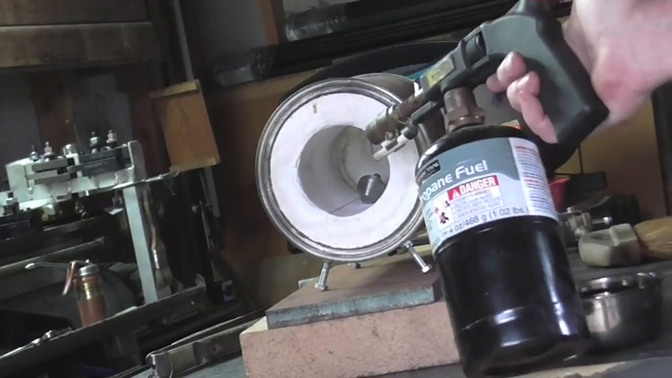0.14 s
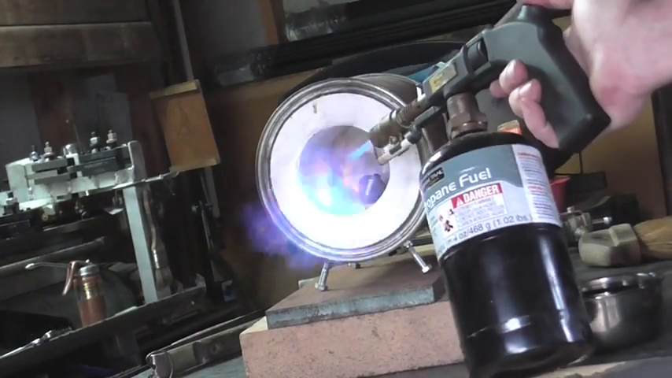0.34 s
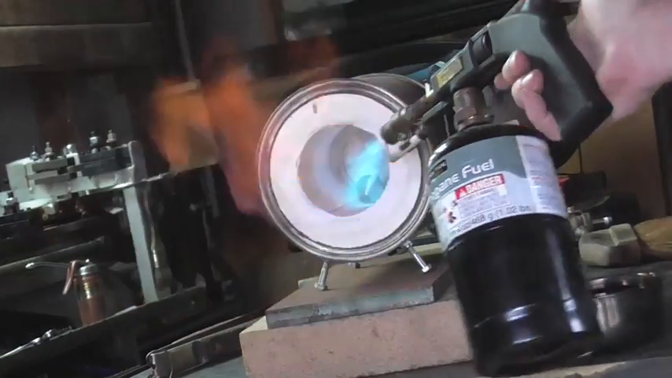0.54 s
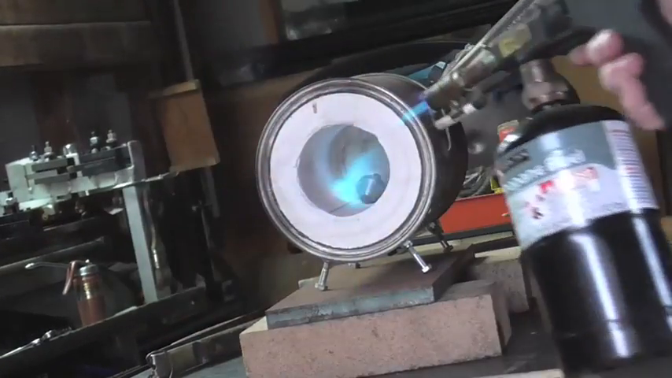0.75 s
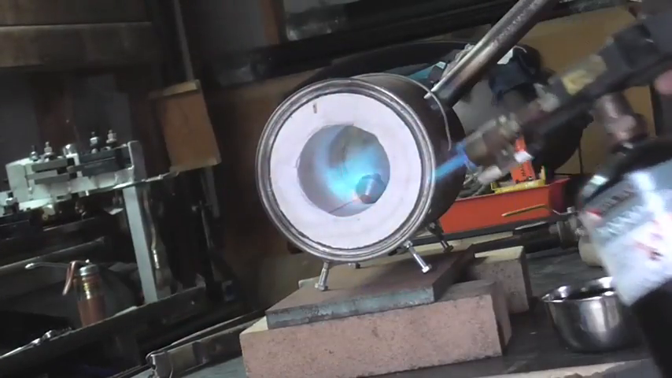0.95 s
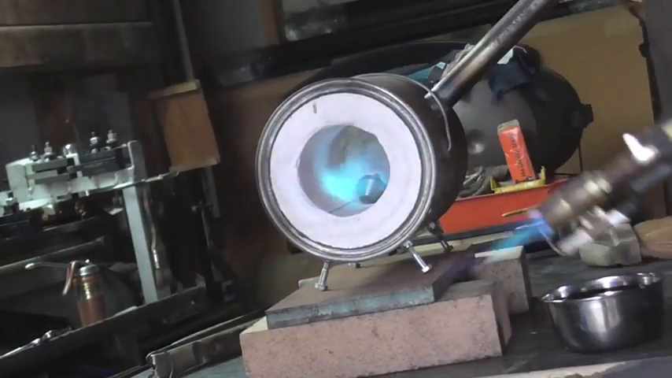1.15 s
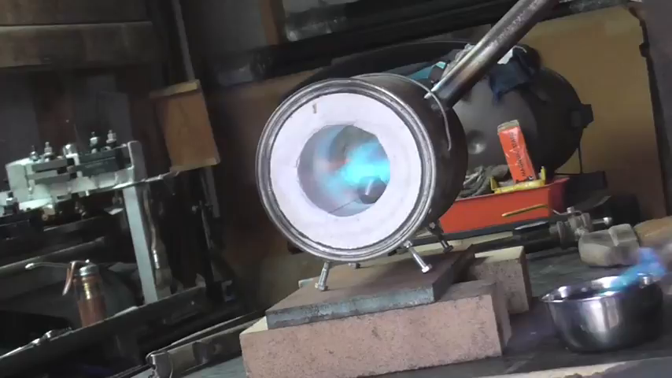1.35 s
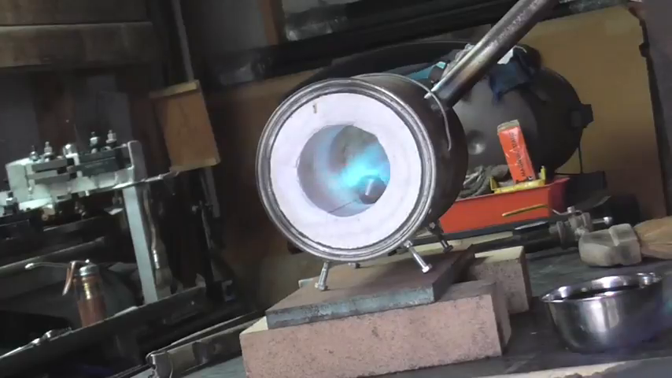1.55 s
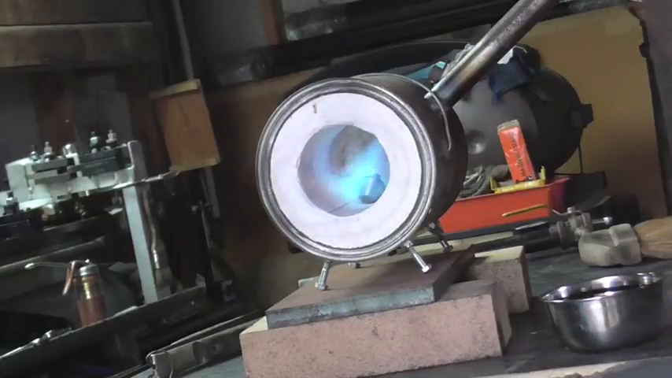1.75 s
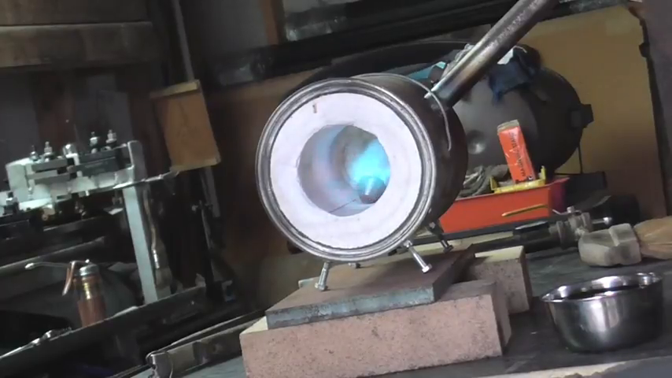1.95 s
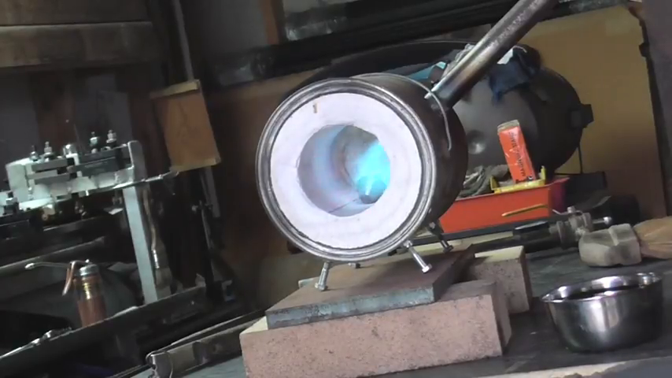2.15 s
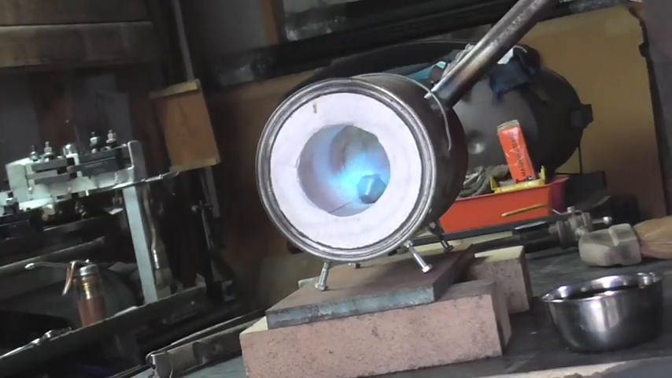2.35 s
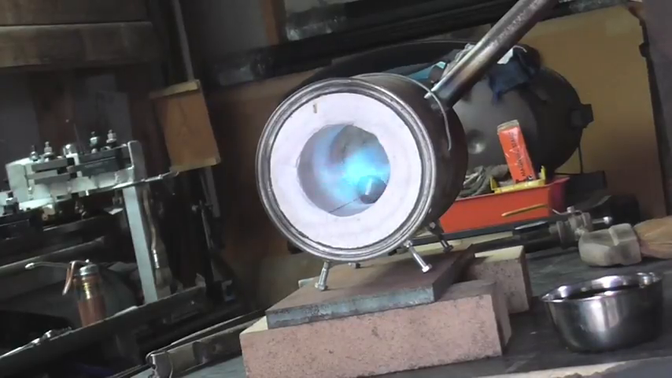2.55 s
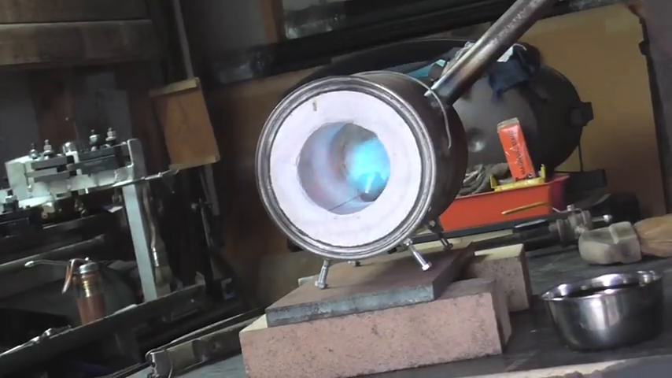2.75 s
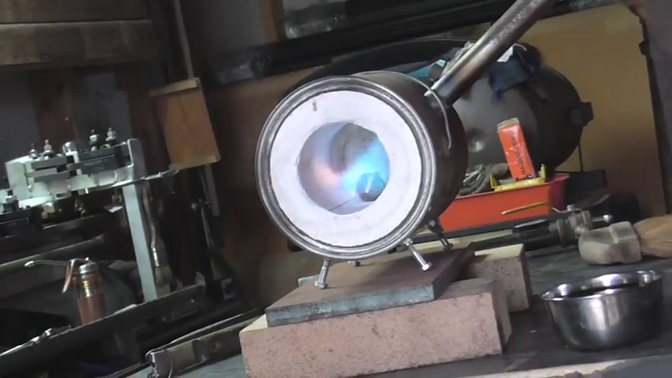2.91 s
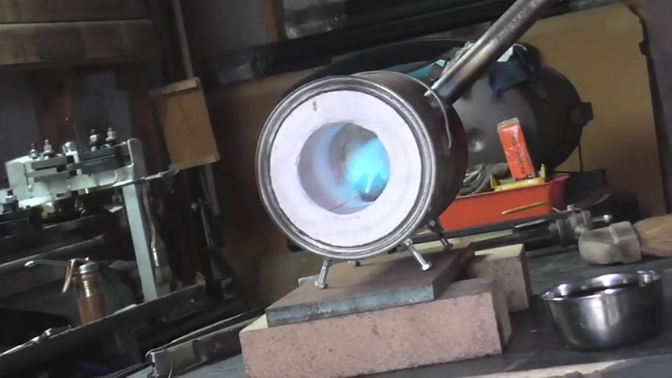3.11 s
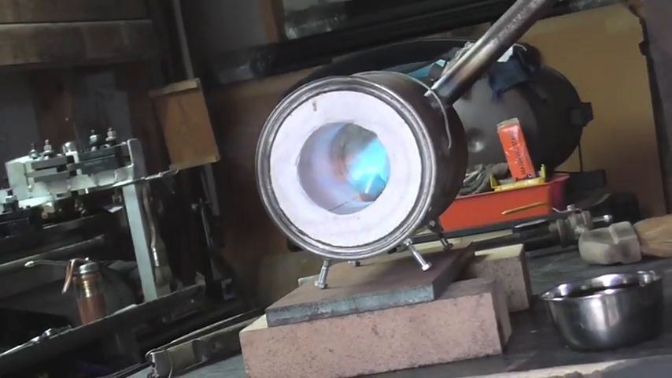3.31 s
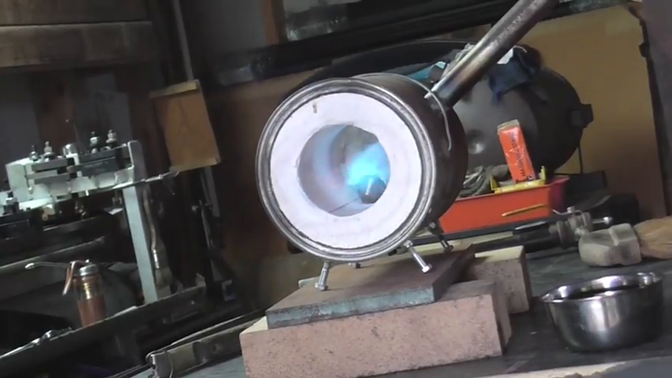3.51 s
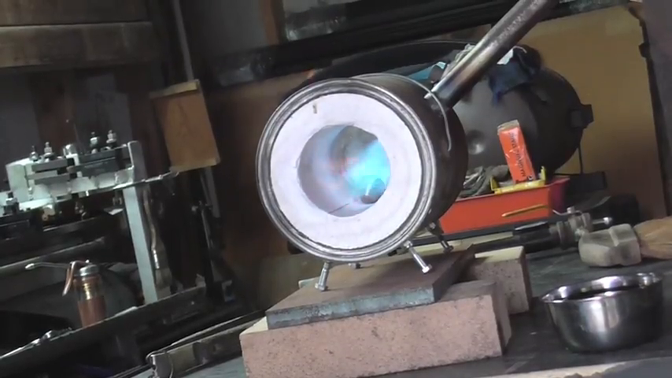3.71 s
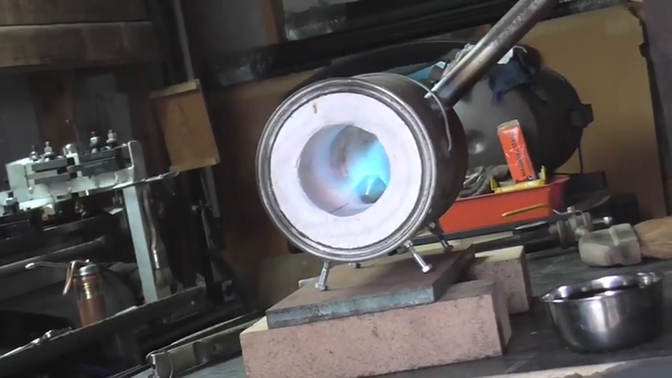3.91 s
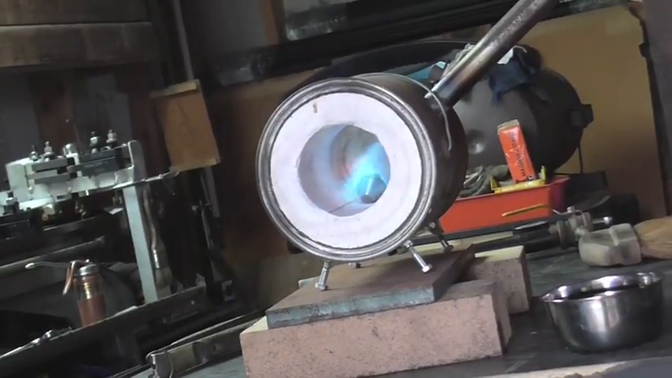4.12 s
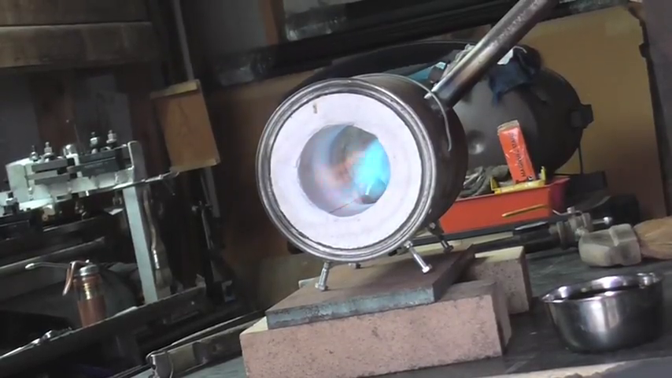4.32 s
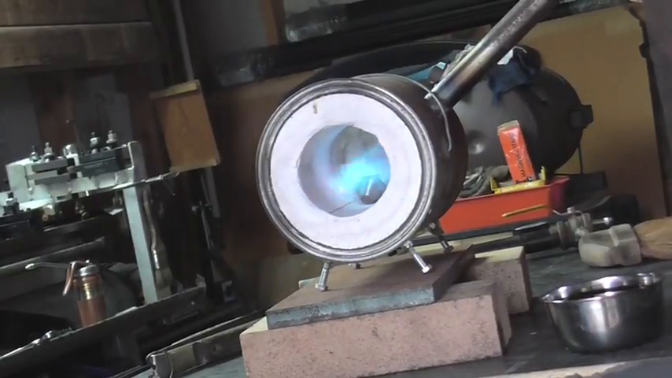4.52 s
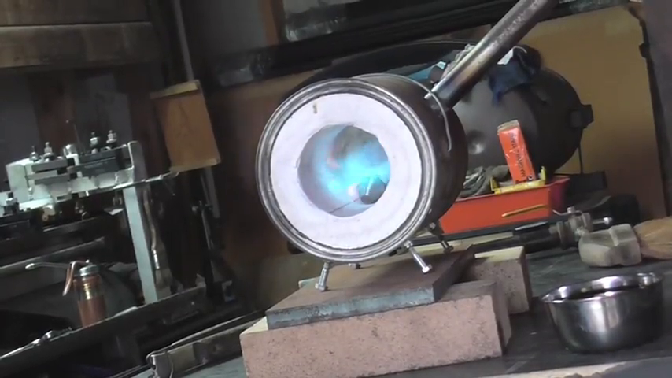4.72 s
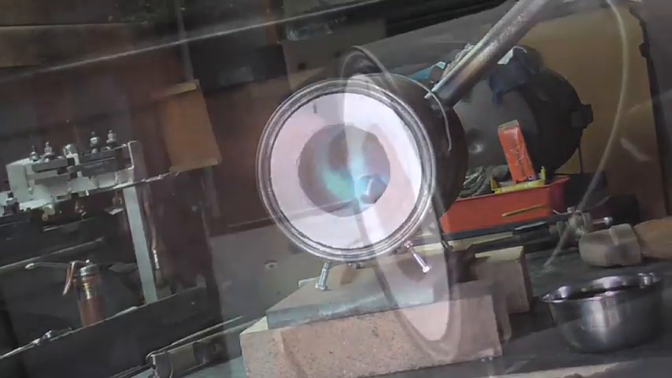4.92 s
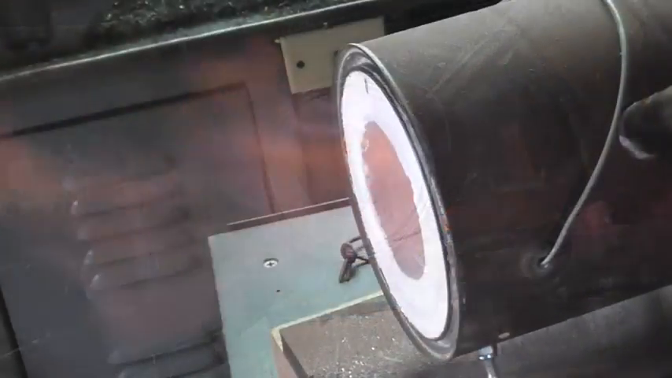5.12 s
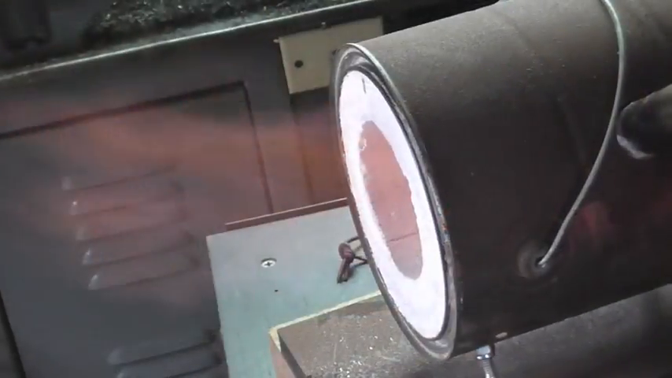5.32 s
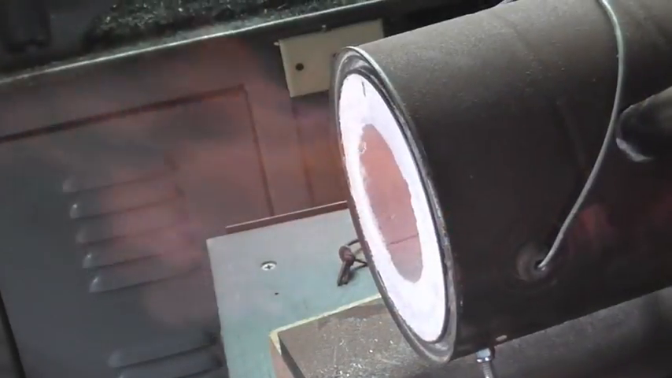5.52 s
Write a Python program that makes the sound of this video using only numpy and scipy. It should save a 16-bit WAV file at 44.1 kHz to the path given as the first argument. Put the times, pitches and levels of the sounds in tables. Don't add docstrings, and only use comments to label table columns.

```python
import sys
import numpy as np
from scipy import signal
from scipy.fft import rfft, irfft, next_fast_len
from scipy.io import wavfile
from scipy.ndimage import uniform_filter1d, minimum_filter1d, map_coordinates

SR = 44100
rng = np.random.default_rng(int(sys.argv[2]) if len(sys.argv) > 2 else 0)


def how_loud(loudness_db):
    steps = np.asarray(loudness_db, float) / 20
    return 10 ** steps


def wav_record(signal):
    frames = np.transpose(np.atleast_2d(signal))
    bounded = np.clip(frames, -1, 1)
    quanta = np.round(bounded * 32767).astype(np.int16)
    wavfile.write(sys.argv[1], SR, quanta)


N = 249606
SIZE = next_fast_len(N + SR // 2, True)
T = np.arange(N) / SR
HZ = np.arange(SIZE // 2 + 1) * SR / SIZE + 1e-3
ECHO_S = T[:SR // 2]


def noise():
    return rng.standard_normal(N)


def level(x):
    return x / np.sqrt(np.mean(x ** 2))


def gain_curve(table):
    return how_loud(np.interp(T, *np.transpose(table)))


def slope(points):
    hz, db = np.transpose(points)
    return how_loud(np.interp(np.log(HZ), np.log(hz), db))


def ringing(modes):
    return sum(how_loud(db) / (1 + 1j * (HZ - hz ** 2 / HZ) / width) for hz, width, db in modes)


def through(x, gain):
    return irfft(rfft(x, SIZE) * gain, SIZE)[:N]


def walk(rate):
    k = int(SR / rate)
    steps = np.repeat(rng.standard_normal(N)[:N // k + 1], k)
    slewed = uniform_filter1d(uniform_filter1d(steps, k), k)
    return level(slewed[:N])


def echo(t60):
    onset = np.clip(ECHO_S / 0.0026, 0, 1)
    tail = rng.standard_normal(len(ECHO_S)) * how_loud(-60 * ECHO_S / t60) * onset
    return rfft(tail / np.sqrt(np.sum(tail ** 2)), SIZE)


def gate(on_s, rise_s, off_s, t60):
    return np.clip((T - on_s) / rise_s, 0, 1) * how_loud(-60 * np.clip(T - off_s, 0, None) / t60)


DISSOLVE_S, DISSOLVE_DIP_DB = (4.67, 5.33), -3.5


def dissolve(front, beside):
    turn = np.pi / 2 * np.interp(T, DISSOLVE_S, (0, 1))
    sag = how_loud(DISSOLVE_DIP_DB * np.sin(2 * turn))
    return sag * (np.cos(turn) * front + np.sin(turn) * beside)


# time in seconds, level in dB.
IGNITE = [(.49, -57), (.5, -23), (.528, -25), (.538, -14), (.595, -21), (.645, -36), (.69, -17.5),
          (.75, -19), (.78, -14)]
# time in seconds, level in dB.
BURN = [(1.0, -14), (1.75, -14), (2.3, -13), (2.9, -13), (3.3, -14.5), (3.55, -12.5), (4.1, -13.5),
        (4.5, -13.5), (5.66, -13)]
# frequency in Hz, width in Hz, level in dB.
FRONT = [(104.2, 3.7, -10), (120.8, 21.7, -12), (147, 28, -19), (176.1, 8.9, -10), (194.6, 9.3, -13.5),
         (246.6, 4.3, -5), (253.8, 12, 0), (282.1, 11.8, -6), (299.5, 17, -19), (331.2, 38, -5.5),
         (362.5, 20.6, -10), (410.3, 24, -9.5), (451, 8.6, -10.5), (500.7, 20, -11), (550, 18.7, -2),
         (577, 7.8, -10), (602, 4.8, -4.5), (635, 14.4, -14.5), (667, 37, -7.5), (719.7, 15, -9.5),
         (777.3, 51, -10.5), (797.5, 35, -13), (853.4, 14, -13.5), (895, 14.2, -8), (1012.7, 8.2, -13),
         (1167, 18, -18), (1281, 125, -6)]
# frequency in Hz, width in Hz, level in dB.
BESIDE = [(103, 15, -7), (163, 21, -7.5), (192, 14, -5), (236.4, 4.4, -5.5), (262, 45, -2.5),
          (340, 81, -1.5), (407, 22, -21.5), (484, 64, -2.5), (520, 8.5, -15.5), (580, 11, 3.5),
          (648, 44, 2), (677, 51, -7), (770, 14.5, 4), (880, 10, -3), (900, 1.7, -47), (957, 12, -5)]
# frequency in Hz, level in dB.
REACH = [(30, -21), (60, -28), (90, 3.5), (950, 1), (1400, -25.5), (2600, -36)]
# frequency in Hz, level in dB.
BROAD = [(25, -49), (42, -29), (65, -30), (120, -50), (900, -50), (1100, -23.5), (1300, -36), (1500, -32.5),
         (1750, -32), (1950, -38), (2250, -43), (2600, -78.5), (3300, -110)]
# frequency in Hz, level in dB.
BROAD_BESIDE = [(30, -50), (70, -13.5), (300, -4.5), (800, -56), (1100, -13), (1300, -17), (1600, -20),
                (1850, -31.5), (2250, -39), (2600, -64), (3300, -110)]


def roar():
    ripple = (1 + how_loud(-1.5) * echo(0.23)) / 1.355
    places = []
    for modes, broad in (FRONT, BROAD), (BESIDE, BROAD_BESIDE):
        eddies = noise() * how_loud(1.5 * walk(150) + 0.5 * walk(29.66))
        body = slope(REACH) * ringing(modes) + slope(broad) * ripple
        places.append(level(through(eddies, body)))
    return gain_curve(IGNITE + BURN) * dissolve(*places)


JET_DB, JET_COLD_DB, JET_WARM_S = -47.5, -54, (0.25, 1.6)
JET_SURGE_DB, JET_SURGE_T60_S = -39.5, 0.12
JET_PER_FLAME_DB, JET_SAG_DB_PER_S = 0.2, 0.5
SHUT_S = 2.41


def jet_flow():
    flame_db = np.interp(T, *np.transpose(BURN))
    warm_db = np.interp(T, JET_WARM_S, (JET_COLD_DB, JET_DB))
    db = warm_db + JET_PER_FLAME_DB * (flame_db - flame_db.mean())
    steady = how_loud(db - JET_SAG_DB_PER_S * np.clip(T - SHUT_S, 0, None))
    return steady + how_loud(JET_SURGE_DB - 60 * T / JET_SURGE_T60_S)


# frequency in Hz, level in dB.
HISS = [(1410, -28), (2400, 4), (2640, -2), (3300, 0), (4180, 0.5), (4460, 3), (5480, 6.5), (5930, 0),
        (7180, -1), (9330, -5.5), (12500, -19), (15000, -40), (16000, -34)]
# frequency in Hz, level in dB.
HISS_BESIDE = [(1410, -43), (2400, 2), (2540, -14), (2730, -5), (3300, -2.5), (3660, -14), (4250, 0),
               (5180, 0.5), (5700, 1), (7010, -5.5), (8410, -4.5), (11700, -7), (16000, -22)]
# frequency in Hz, width in Hz, level in dB.
EDGE_TONE = [(8550, 130, 3)]


def jet():
    hiss = noise()
    ripple = 1 + how_loud(-6.0) * echo(0.13)
    flutter = how_loud(1.0 * walk(28.08) + 2.3 * walk(90))
    front = level(through(hiss * flutter, slope(HISS) * ripple))
    rim = 1 + ringing(EDGE_TONE)
    beside = level(through(hiss * how_loud(1.2 * walk(28)), slope(HISS_BESIDE) * ripple * rim))
    return jet_flow() * dissolve(front, how_loud(2.5) * beside)


TORCH_DB, LEAK_DB, TRIGGER_DB = -47, -50.5, -49
PRESS_S, HELD_S = 0.171, (0.56, 0.705)
VALVE_RISE_S, VALVE_T60_S, SETTLE_S = 0.05, 0.11, 0.06
PUFF_DB, PUFF_RISE_S, PUFF_T60_S = (-35.5, -34.5), 0.004, 0.089


def valve():
    puffs = sum(how_loud(db) * gate(s, PUFF_RISE_S, s + PUFF_RISE_S, PUFF_T60_S)
                for s, db in zip((PRESS_S, HELD_S[1]), PUFF_DB))
    flow = gate(PRESS_S, VALVE_RISE_S, HELD_S[0], VALVE_T60_S)
    flow += gate(HELD_S[1], SETTLE_S, SHUT_S, VALVE_T60_S)
    leak = how_loud(LEAK_DB) * gate(-0.68, 1, PRESS_S, VALVE_T60_S)
    return leak + how_loud(TORCH_DB) * flow + puffs


# frequency in Hz, width in Hz, level in dB.
WHISTLE = [(4640, 170, -12), (4860, 110, 1), (5080, 200, -11), (5430, 200, -10), (6200, 900, -13)]
# frequency in Hz, width in Hz, level in dB.
OVERTONE = [(9300, 300, -12)]
# frequency in Hz, width in Hz, level in dB.
TRIGGER = [(5460, 360, -6), (7240, 600, -2), (10400, 400, -7)]
NOZZLE_FLOOR_DB = -24
COLD_PITCH, WARM_S = 0.972, (0.75, 1.2)


def torch():
    gas_noise = noise() * how_loud(1.5 * walk(13.73))
    narrow = slope([(3300, -26), (4500, 0), (9450, 0), (9900, -7), (10800, -8), (13000, -24)])
    bands = np.hypot(np.abs(ringing(WHISTLE)), how_loud(NOZZLE_FLOOR_DB))
    song = through(gas_noise, bands * narrow)
    pitch = np.interp(T, WARM_S, (COLD_PITCH, 1))
    song = map_coordinates(song, [np.cumsum(pitch)], order=3)
    overtone = through(gas_noise, ringing(OVERTONE) * narrow)
    whistle = how_loud(2.5) * valve() * level(song + overtone)
    held = gate(HELD_S[0], VALVE_RISE_S, HELD_S[1] - 0.015, 0.08)
    return whistle + how_loud(TRIGGER_DB) * held * level(through(gas_noise, ringing(TRIGGER) * narrow))


GAS_DB, GAS_RISE_DB_PER_S, GAS_SPARK_S, GAS_FLARE_DB, GAS_LIT_S = -36.5, 10.5, 0.43, -27.5, 0.565
GAS_LEFT_DB, GAS_BURN_S, GAS_FADE_DB_PER_S = -39, 0.047, 27


def gas_flow():
    times = (0, GAS_SPARK_S, GAS_LIT_S, GAS_LIT_S + GAS_BURN_S)
    spark_db = GAS_DB + GAS_RISE_DB_PER_S * GAS_SPARK_S
    db = np.interp(T, times, (GAS_DB, spark_db, GAS_FLARE_DB, GAS_LEFT_DB))
    return how_loud(db - GAS_FADE_DB_PER_S * np.clip(T - times[-1], 0, None))


# frequency in Hz, level in dB.
GAS = [(24, -53), (40, -15), (75, -19), (100, 4), (130, -0.5), (190, -13.5), (320, -8.5), (450, -20),
       (700, -13.5), (900, -9.5), (1400, -14), (1900, -20), (2300, -30), (3200, -69)]


def gas():
    rush = noise() * how_loud(1.3 * walk(40.2))
    return gas_flow() * level(through(rush, slope(GAS) * (1 + how_loud(-10) * echo(0.038))))


# start in seconds, peak in dB, frequency in Hz, t60 in seconds.
THUMPS = [
    (.494, -27, 252, 0.43),
    (.503, -12, 374, 0.093),
    (.522, -19, 104.4, 0.35),
    (.535, -3, 326, 0.072),
    (.537, -16, 586, 0.29),
    (.537, -20.5, 1030, 0.31),
]


def thumps():
    out = np.zeros(N)
    for s, db, hz, t60 in THUMPS:
        swing = np.sin(2 * np.pi * hz * ECHO_S)
        out[int(s * SR):][:len(ECHO_S)] += how_loud(db - 60 * ECHO_S / t60) * swing
    return out


# frequency in Hz, level in dB.
ECHO = [(1180, -6), (2000, -1.5), (2980, -5), (3680, -2.5), (5250, -3.5), (9580, -11), (11300, -24),
        (12800, -18), (16000, -25)]


def shop_answer():
    return level(through(noise(), slope(ECHO)))


# start in seconds, peak in dB, lowest Hz, highest Hz, shop echo in dB.
CLICKS = [(.1125, -35, 8000, 16000, -9), (0.1718, -20, 2000, 13000, -5.5), (0.4686, -3, 1210, 8400, -10),
          (0.534, -21.5, 900, 2550, -26), (.6564, -38, 3000, 16000, -30), (0.7063, -23, 1500, 10800, -4),
          (2.43, -53, 6000, 8000, -22), (2.536, -31.5, 2570, 3050, -24), (3.393, -34, 3500, 10000, -10),
          (3.4173, -20, 1300, 4200, -11), (3.435, -31, 2500, 8000, -12), (4.127, -32, 1900, 8900, -8)]
SHOP_T60_S = 0.22
RING_CYCLES, RING_MOST_S = 72, 0.06


def clicks(answer):
    out = np.zeros(N)
    for s, db, low_hz, high_hz, echo_db in CLICKS:
        t60 = min(RING_CYCLES / (high_hz - low_hz), RING_MOST_S)
        burst = rng.standard_normal(len(ECHO_S)) * how_loud(-60 * ECHO_S / t60)
        band = signal.butter(2, (low_hz, high_hz), "band", fs=SR, output="sos")
        crack = signal.sosfilt(band, burst)
        here = slice(int(s * SR), int(s * SR) + len(ECHO_S))
        tail = how_loud(echo_db - 8.5 - 60 * ECHO_S / SHOP_T60_S) * answer[here]
        out[here] += how_loud(db) * (crack / np.abs(crack).max() + tail)
    return out


# start in seconds, level in dB, rise in seconds, length in seconds.
SCRAPES = [
    (4.946, -43, .006, .03),
    (5.023, -38.5, .003, .025),
]
# frequency in Hz, width in Hz, level in dB.
SCRAPE = [(3600, 1400, 0.5), (5670, 420, 2), (8400, 1200, -3.5), (9200, 710, -17), (13000, 2500, -20)]
SCRAPE_T60_S = 0.18


def scrapes():
    grit = noise() * how_loud(1.8 * walk(300))
    rub = level(through(grit, ringing(SCRAPE) * slope([(10500, 0), (16000, -10)])))
    return sum(how_loud(db) * rub * gate(s, rise, s + length, SCRAPE_T60_S) for s, db, rise, length in SCRAPES)


SLIDE_S, SLIDE_DB, SLIDE_RISE_S, SLIDE_END_S, SLIDE_T60_S = 3.368, -43.5, 0.015, 3.455, 0.13


def slide(answer):
    rub = through(answer, slope([(7000, -1), (12000, -14)]))
    return how_loud(SLIDE_DB) * rub * gate(SLIDE_S, SLIDE_RISE_S, SLIDE_END_S, SLIDE_T60_S)


def handling():
    answer = shop_answer()
    return clicks(answer) + scrapes() + slide(answer)


# frequency in Hz, level in dB.
AIR = [(7000, -29), (9500, 4), (12000, 4.5), (14000, 2), (15000, -6), (15600, -15)]
AIR_DB = -64


def air():
    return how_loud(AIR_DB) * level(through(noise(), slope(AIR)))


# frequency in Hz, side minus mid in dB.
SIDE_DB = [(30, -10), (60, -18.5), (200, -24), (380, -15), (700, -17.5), (1300, -13), (2400, -11.5),
           (4400, -12.5), (5600, -21.5), (8200, -19.5), (9200, -7.5), (11800, -1.5), (12800, -29)]


def scene():
    mid = roar() + jet() + torch() + gas() + thumps() + handling() + air()
    side = through(mid, slope(SIDE_DB) * echo(0.065))
    return np.array([mid + side, mid - side])


def top_cut(x):
    return signal.sosfilt(signal.butter(12, 16990, fs=SR, output="sos"), x)


def record(dry):
    top = slope([(15500, 0), (15800, -70)])
    room = np.minimum(1, 0.97 / (np.abs(dry).max(axis=0) + 1e-9))
    gain = uniform_filter1d(minimum_filter1d(room, size=301), size=301)
    mix = np.array([through(port, top) for port in gain * dry])
    return top_cut(mix)


dry = scene()
out = record(dry)
wav_record(out)
```